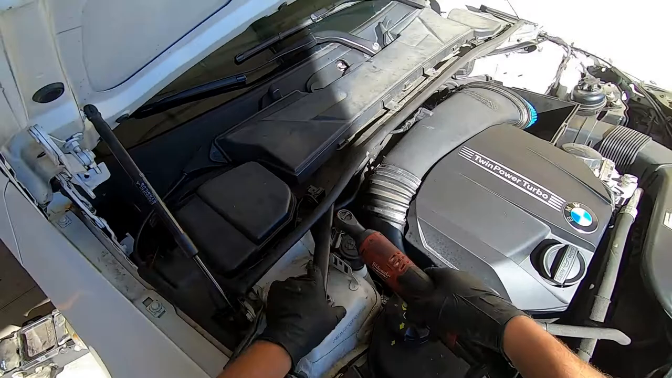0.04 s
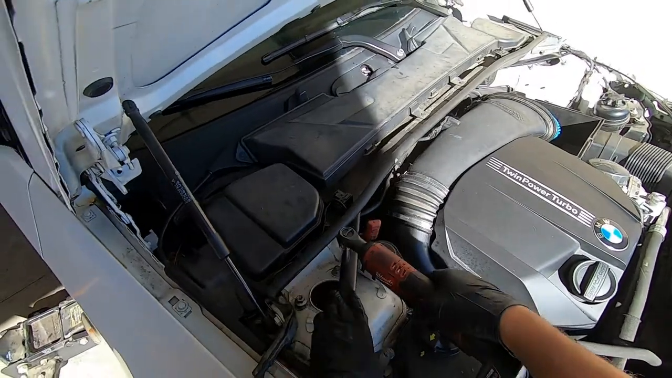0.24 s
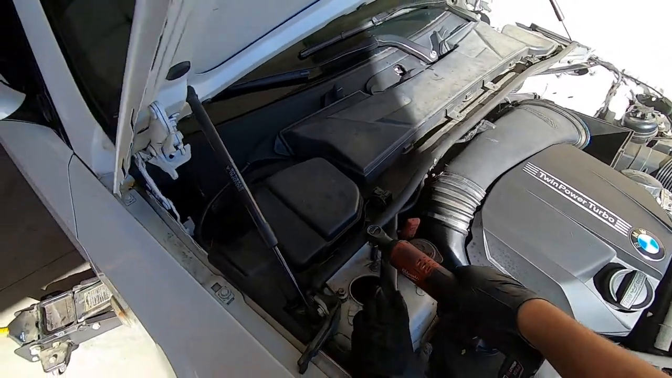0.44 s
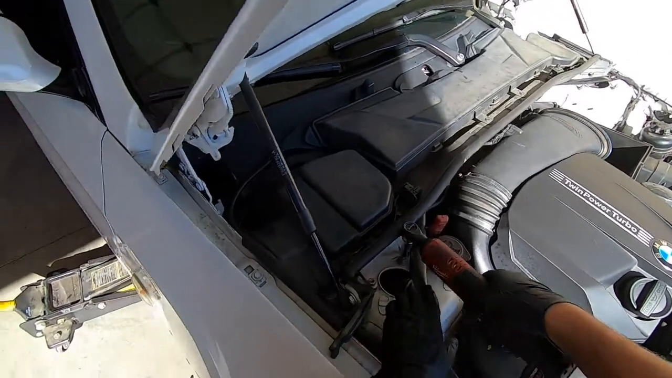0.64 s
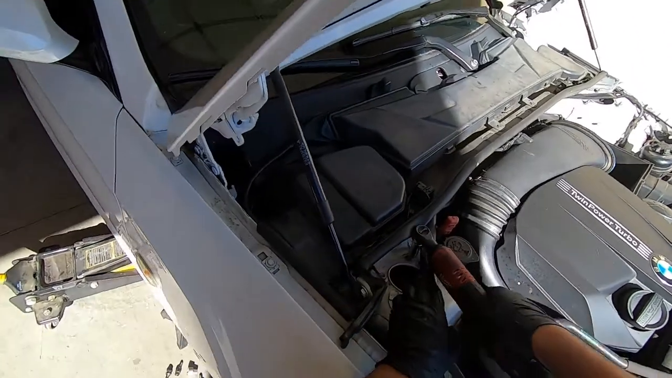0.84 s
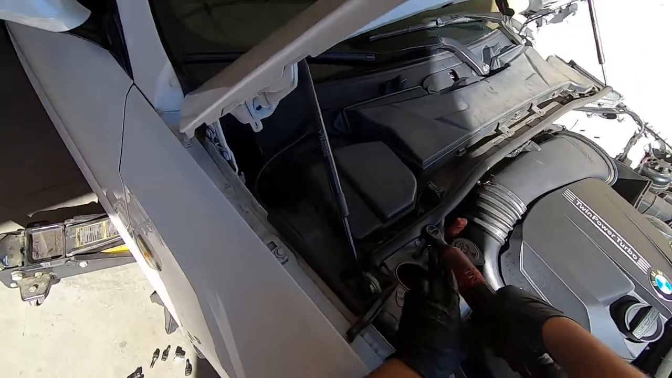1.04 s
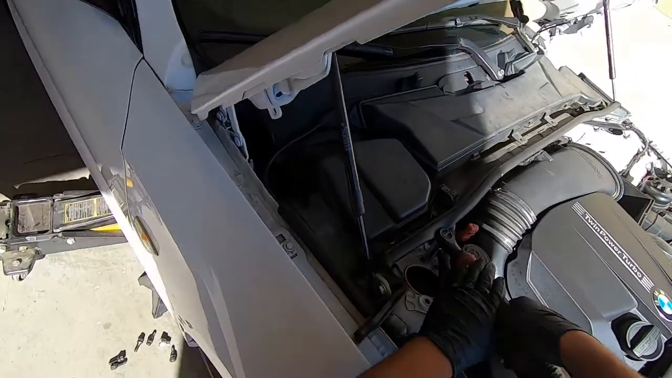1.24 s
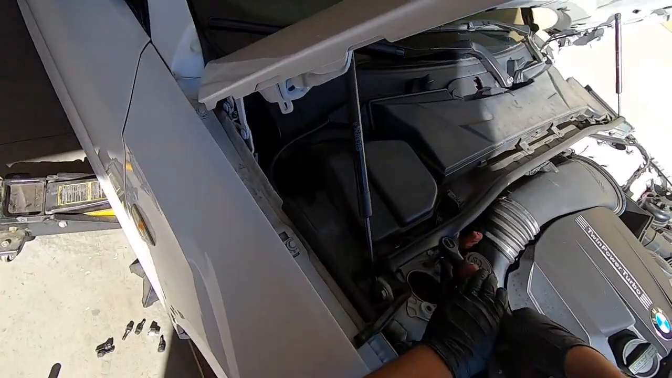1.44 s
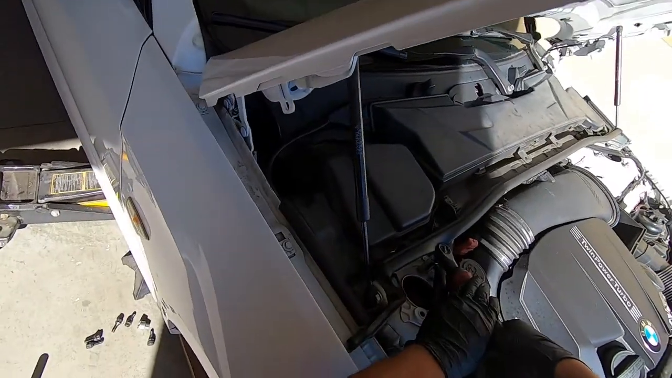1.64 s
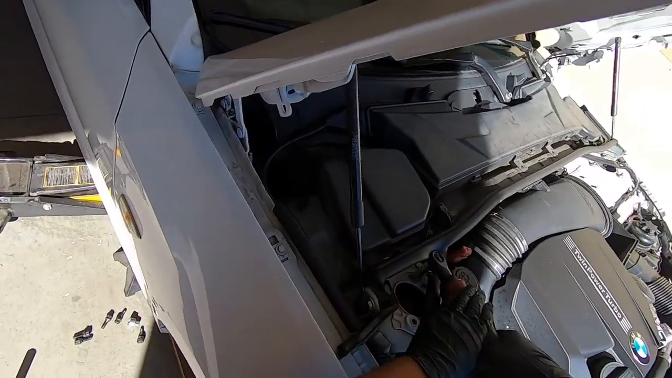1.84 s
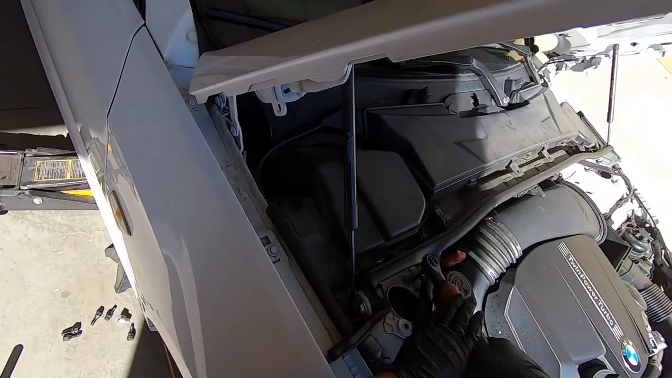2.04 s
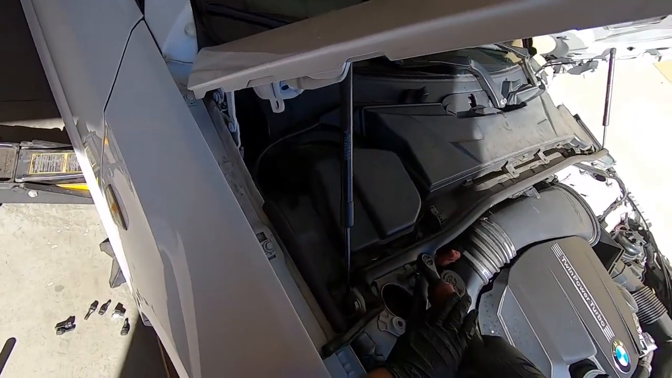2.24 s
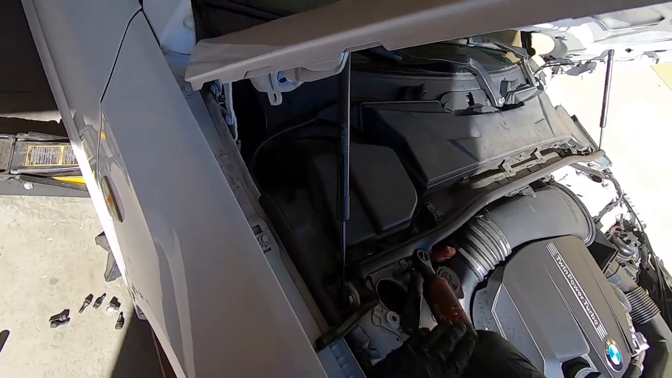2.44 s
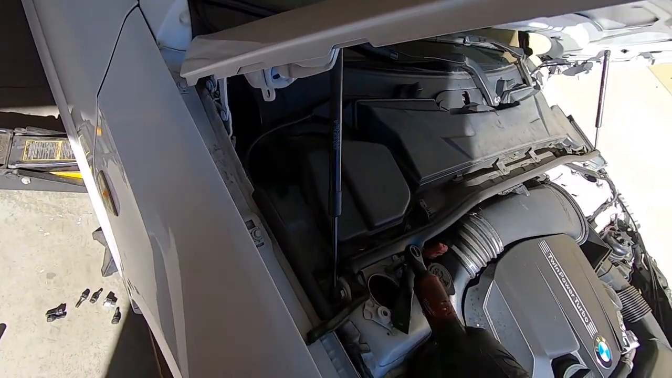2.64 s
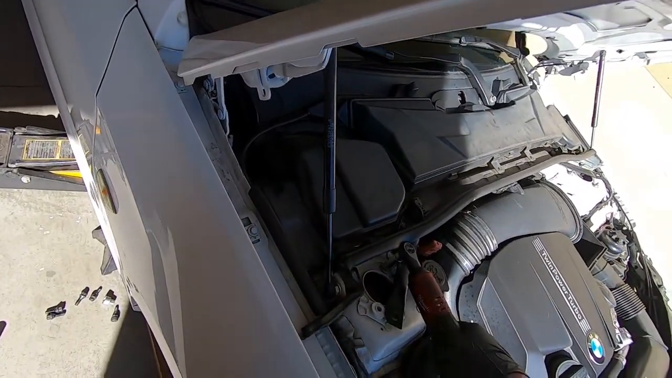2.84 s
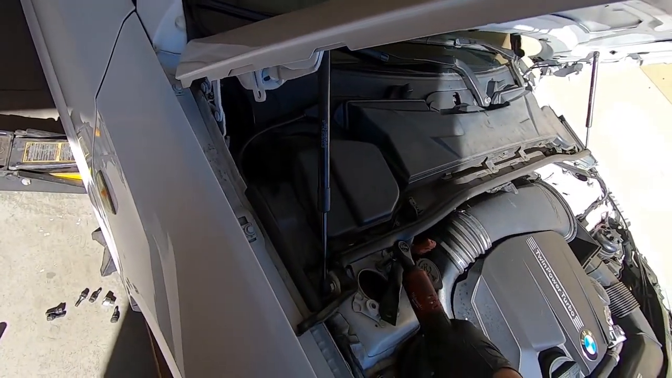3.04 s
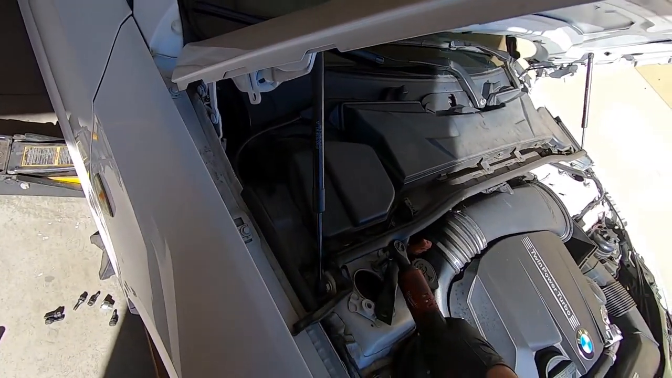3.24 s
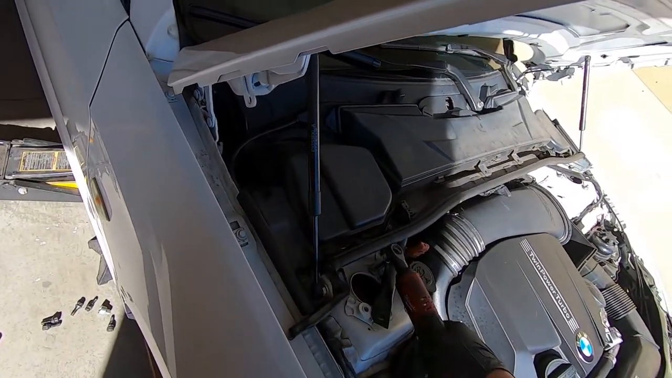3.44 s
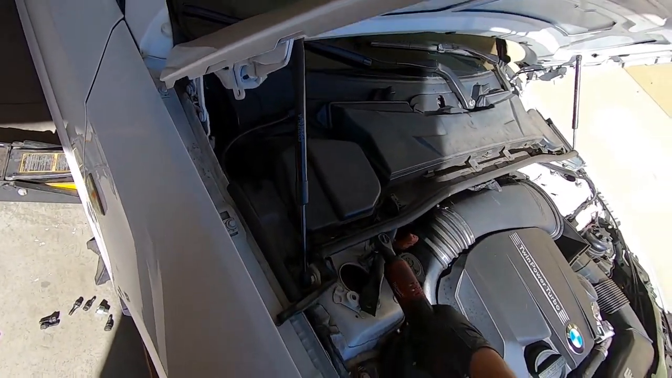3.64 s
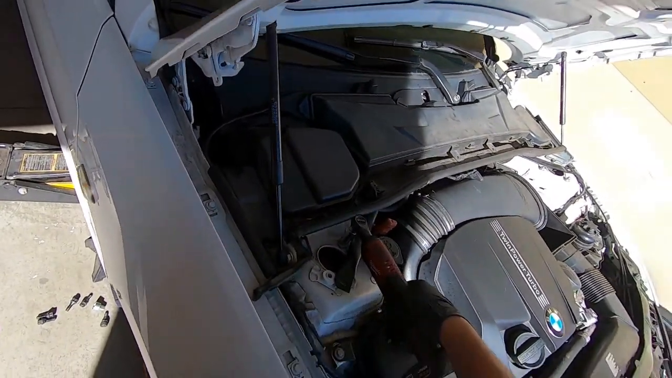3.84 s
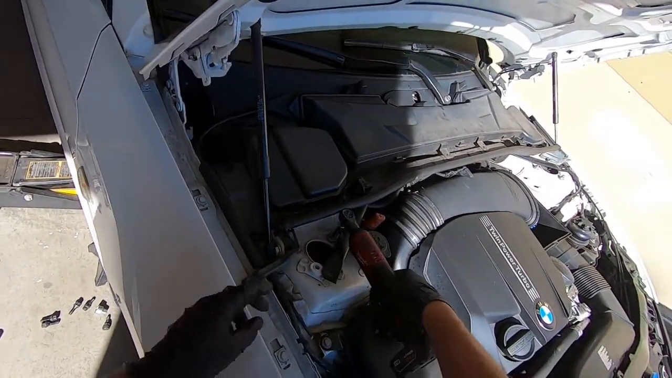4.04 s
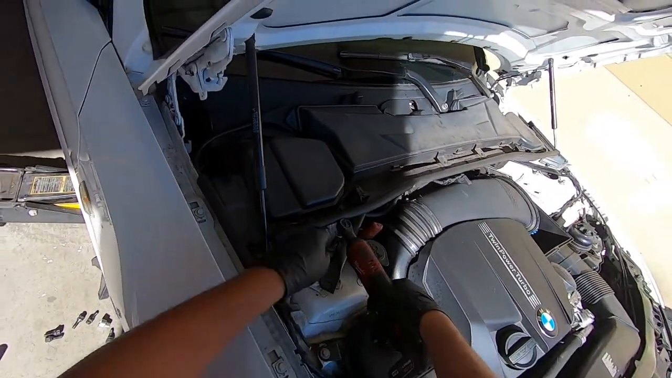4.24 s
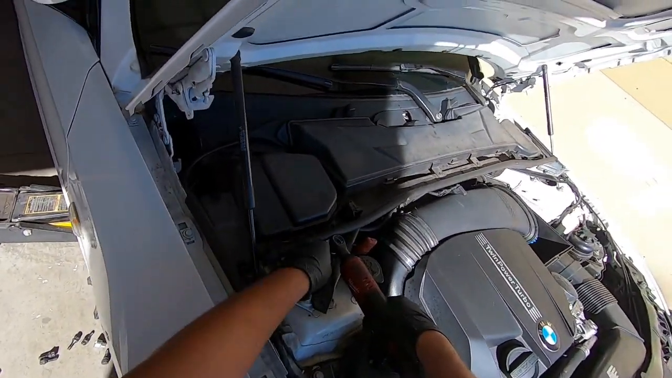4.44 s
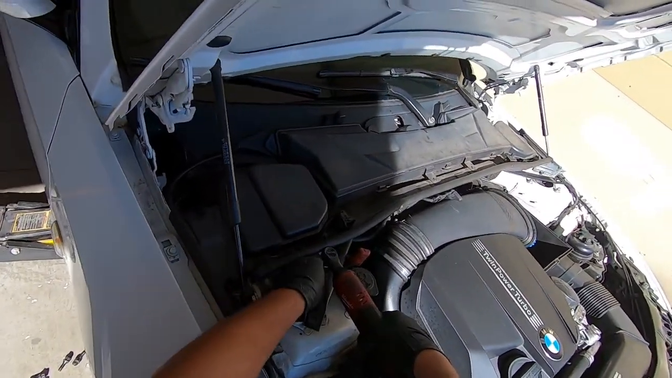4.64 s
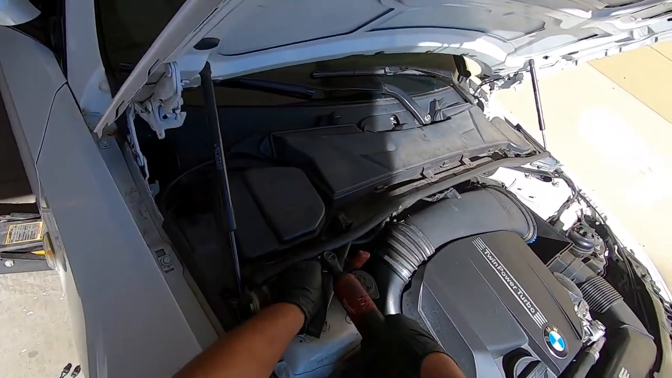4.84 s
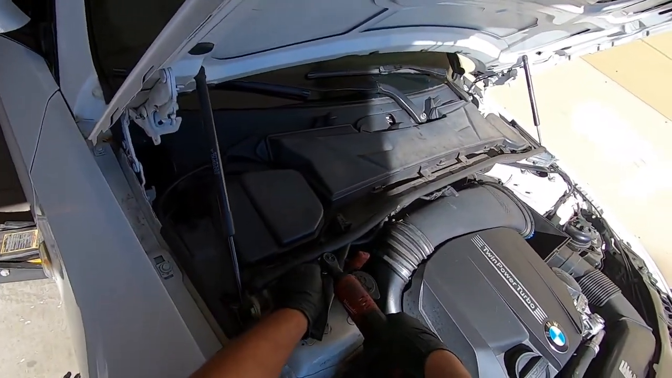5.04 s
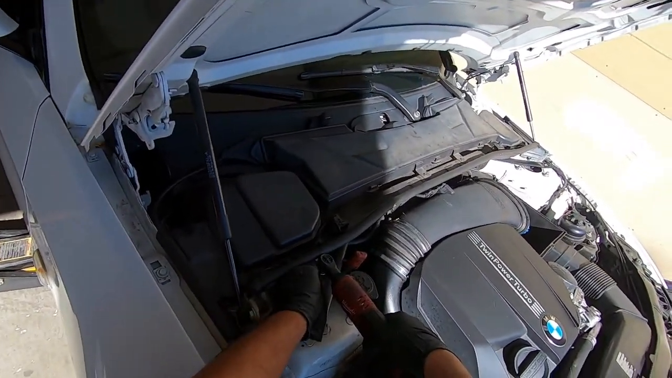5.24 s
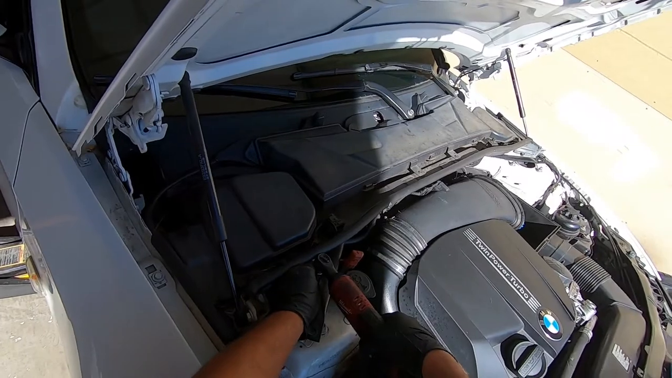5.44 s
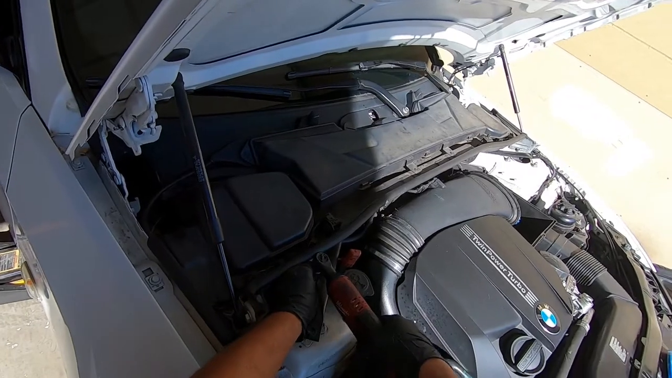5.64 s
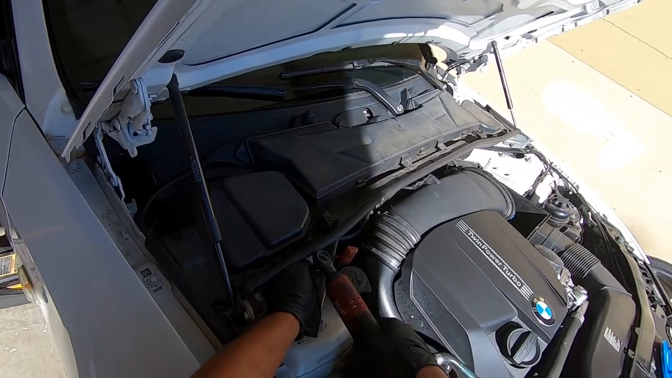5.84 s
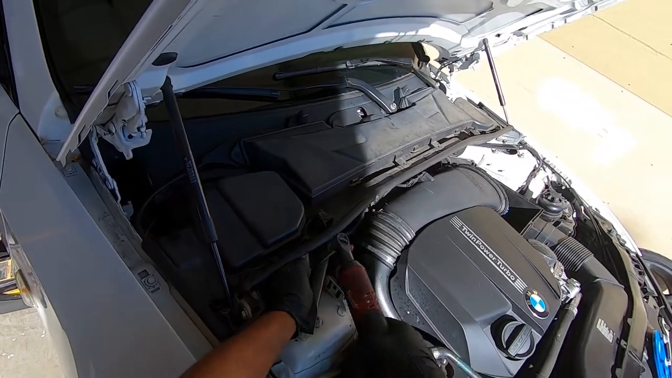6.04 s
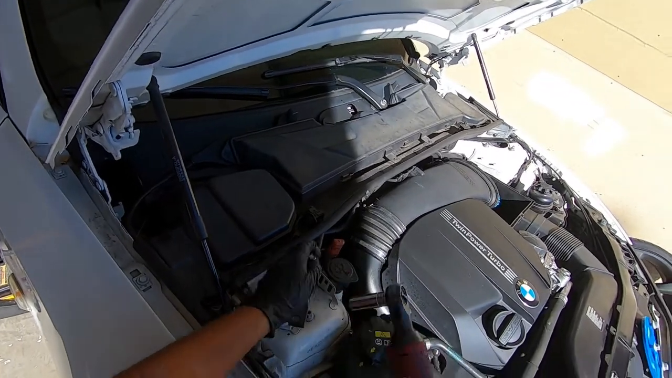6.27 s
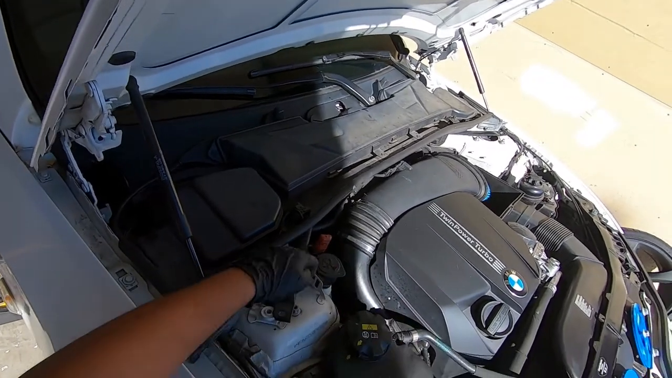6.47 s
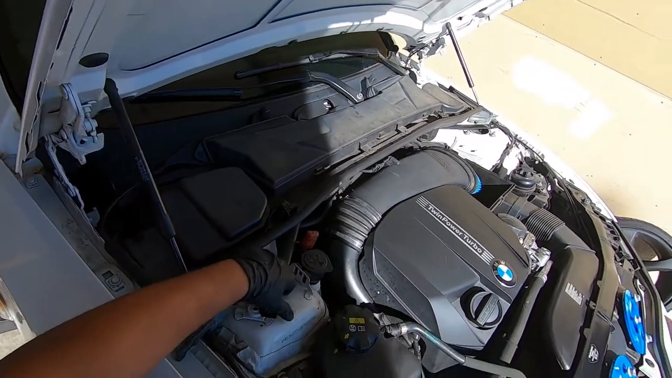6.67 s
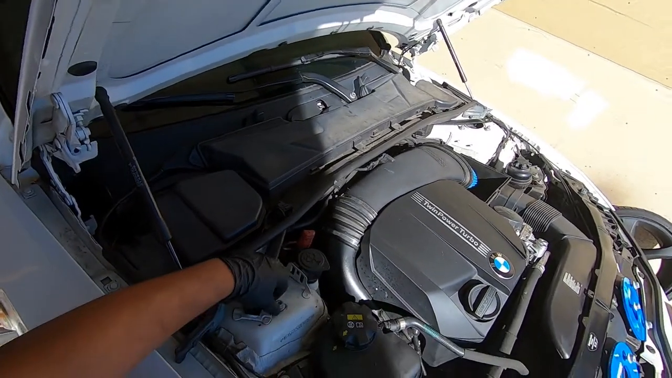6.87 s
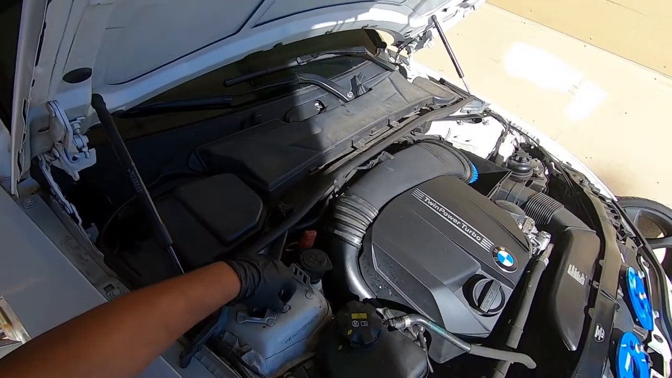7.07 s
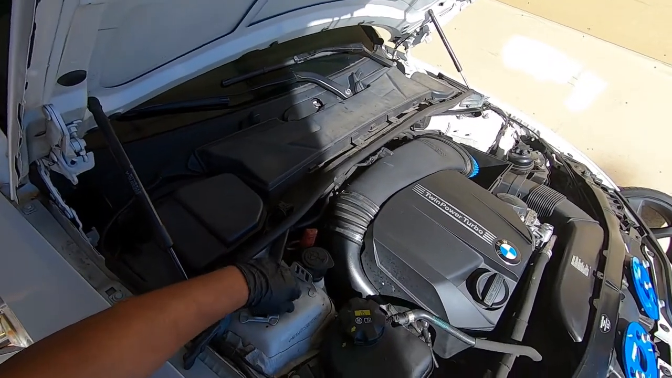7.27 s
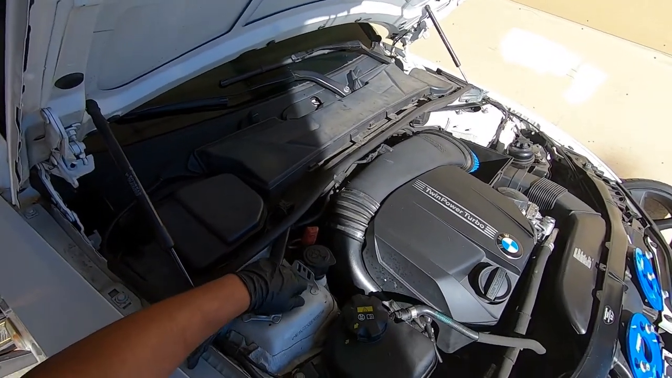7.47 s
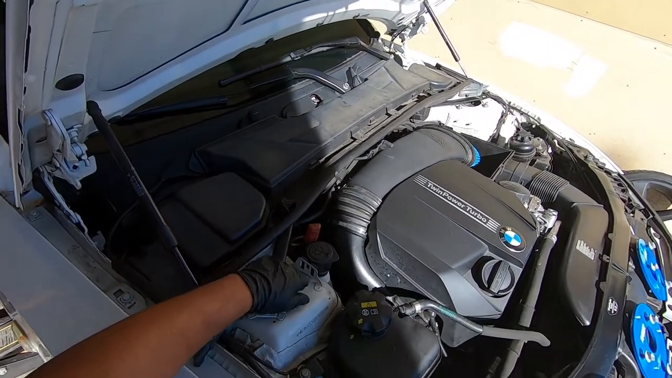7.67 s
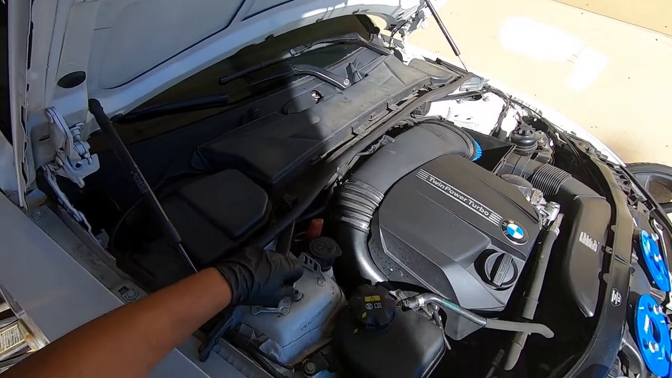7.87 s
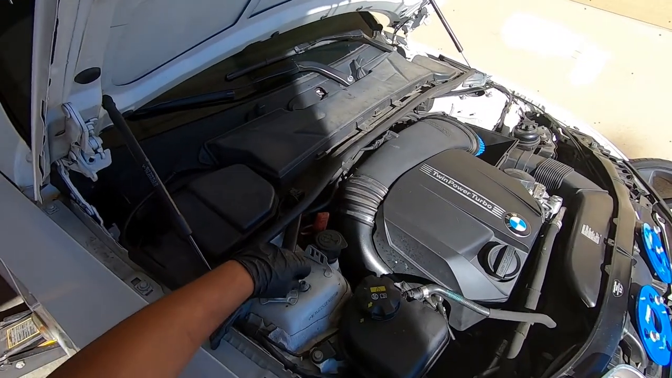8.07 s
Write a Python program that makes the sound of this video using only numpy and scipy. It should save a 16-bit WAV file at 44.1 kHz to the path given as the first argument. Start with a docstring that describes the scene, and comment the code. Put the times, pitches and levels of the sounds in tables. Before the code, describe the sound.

Close and slightly to the right, a metal socket clicks, clinks and bumps on a bolt in a car's engine bay, with the sharpest knocks near 0.1, 0.4 and 1 second. At 1.3 seconds a cordless ratchet chirps and spins up, biting at 1.5 with a thump and a loud surge. It runs with a fast, gritty rattle, a thin gear whine and a low panel hum that throbs most around 3 seconds. From about 3.8 seconds it runs slower and lighter, then winds down from 5.5 and stops with a small clink at 6. Faint ticks and gloved rubs follow. Around 6.9 seconds the tool is laid down, landing twice with a short, ringing clatter. The sounds carry a light garage echo. Quiet outdoor air continues until the end at 8 seconds, with very faint chirps, like a far bird, near 6.3 and 7.3.

```python
"""At the door of a garage, a cordless ratchet spins a bolt out in the engine bay of a car.
The socket knocks about until it seats. The motor chirps, spins up and rattles the pawl (the catch
that clicks over the gear teeth), first under load, then more slowly, and winds down to a stop.
A gloved hand turns the bolt on with faint ticks and rubs, and the tool is laid down with a clatter.
Behind it all are quiet outdoor air and a few faint chirps, like a far bird."""
import sys
import numpy as np
from scipy import signal
from scipy.fft import rfft, irfft, next_fast_len
from scipy.io import wavfile
from scipy.ndimage import uniform_filter1d

SR = 44100
rng = np.random.default_rng(int(sys.argv[2]) if len(sys.argv) > 2 else 0)


def generate_wav(sig):
    """Save sig (samples, or channels by samples) to the path in sys.argv[1] as 16-bit PCM at SR."""
    pcm = np.round(np.clip(np.atleast_2d(sig).T, -1, 1) * 32767).astype(np.int16)
    wavfile.write(sys.argv[1], SR, pcm)


N = 357651
T = np.arange(N) / SR
BITE_S, BITE_RISE_S, STOP_S = 1.48, 0.01, 6.0  # the socket bites; the brake stops the motor
TURNS_PER_STROKE, TURNS_PER_BOLT_TURN = 4.383, 109.5  # a stroke is one swing of the pawl


# How hard the bolt's thread grips: (time [s], load [0-1])
THREAD_GRIP = [(1.7, 1), (2.1, 0.64), (2.9, 0.65), (3.0, 0.98), (3.13, 0.67), (3.5, 0.6), (3.75, 0.15),
               (4.4, 0)]

def ratchet():
    """The motor's turns drive the rattling pawl and the gears, and shake the panel under the bolt."""
    load = np.clip(in_time(THREAD_GRIP), 0, 1)
    speed = motor_speed(load)
    pulled_s, full_speed, _ = TRIGGER_MOVES[0]
    running = uniform_filter1d(((T > pulled_s) & (T < STOP_S)) * 1., 400)
    turns = np.cumsum(speed * running * (1 + .0028 * drift(11))) / SR  # the speed wanders a little
    strokes = turns / TURNS_PER_STROKE
    octaves = np.log2((speed + 1) / full_speed)  # -1 means half speed
    press, wobble_db = bolt_wobble(turns)
    bitten, since_bite = ramp(BITE_S, BITE_RISE_S), np.maximum(T - BITE_S, 0)
    # faster is louder, and the bolt breaks free with a surge that dies away
    drive_db = -21 + 8 * octaves - 3.5 * load + 9 * bitten * np.exp(-since_bite / 0.22)
    shake_db = drive_db - 18 + 12 * np.exp(-(since_bite / 0.51) ** 2) + wobble_db
    whine = gear_whine(turns, load)
    hum = bitten * load * panel_hum(strokes, press, wobble_db)
    head = from_db(drive_db + 0.1 * wobble_db) * (rattle(strokes, speed, load) + pings(strokes, load))
    panel = from_db(shake_db) * panel_shake(strokes, load) + hum + thump()
    return running * (head + tip_ticks(strokes, octaves, load) + whine + panel)


# The trigger is pulled, eased and let go: (time [s], target speed [turns/s], time to get there [s])
TRIGGER_MOVES = [(1.37, 352.6, .43), (3.78, 266.4, .47), (5.45, 0, 1.25)]

def motor_speed(load):
    """Turns per second: the motor eases towards each target, and load slows it a little."""
    speed, before = 0, 0
    for s, target, seconds in TRIGGER_MOVES:
        speed = speed + (target - before) * (1 - (1 - ramp(s, seconds)) ** 2.3)
        before = target
    return speed * (1 - .024 * load)


def bolt_wobble(turns, pressing_s=2.765, worst_s=2.94, grow_s=1.22, fade_s=0.71):
    """The crooked bolt presses once each time it goes round; gives the push (0-1) and its swell in dB."""
    bolt_turns = (turns - np.interp(pressing_s, T, turns)) / TURNS_PER_BOLT_TURN
    depth = ramp(worst_s - grow_s, grow_s) - ramp(worst_s, fade_s)
    press = np.cos(np.pi * bolt_turns) ** 2
    return press, 16.5 * depth * press


def pawl(strokes, phase, scatter, spread_db):
    """One click on every stroke, a little off time and of uneven strength."""
    late, loud = rng.standard_normal((2, 512))
    count = min(int(strokes[-1]), 512)
    at = np.searchsorted(strokes, np.arange(count) + phase + scatter * late[:count])
    clicks = np.zeros(N)
    clicks[np.minimum(at, N - 1)] = from_db(spread_db * np.clip(loud[:count], -2, 2))
    return clicks


# Tone of the tool under load, and running free: (pitch [Hz], level [dB])
LOADED_TONE = [(100, -9.5), (230, -5), (330, -3), (480, -3.5), (950, 1), (1200, -5.5), (1600, 1),
               (2300, -3.5), (4000, -2), (5700, -9.5), (7500, -5), (9500, -16.5), (13000, -30.5),
               (15500, -46)]
FREE_TONE = [(100, -29), (230, -14), (350, -9.5), (480, -6), (950, -5), (1200, -5), (1600, -4), (2300, -2),
             (3400, -1.5), (5200, -6.5), (8000, -2.5), (9700, -13), (13000, -24), (15500, -44.5)]
# Pitches at which the tool's head rings: (pitch [Hz], width [Hz], boost [dB])
HEAD_PEAKS = [(1030, 78, 1.5), (1452, 87, 4), (2067, 160, 1), (2870, 110, -0.5), (3156, 130, 3.5),
              (3840, 76, 2.5), (6680, 220, 1.5), (7340, 67, -1.5), (12700, 1400, 5.5)]
# The pawl's clicks are brighter than the gear grit: (pitch [Hz], level [dB])
PAWL_TONE = [(1000, -4.5), (4000, -2), (7000, 0.5), (13000, 3)]

def rattle(strokes, speed, load):
    """Gritty gear noise swells once a stroke, between the chattering clicks of the pawl."""
    # a hard click as the swing turns back, then two skipped teeth
    turnaround = pawl(strokes, phase=0, scatter=.015, spread_db=0.5)
    skips = pawl(strokes, phase=1 / 3, scatter=0.035, spread_db=1.0)
    skips += pawl(strokes, phase=2 / 3, scatter=0.04, spread_db=0.5)
    clicks = die_away(turnaround + (0.72 - 0.25 * load) * skips, seconds=.0007)
    clicks *= .45 + rng.standard_normal(N)  # each also pushes the head the same way: a low buzz
    # gear teeth and the loose socket add many tiny hits
    grit = (rng.random(N) < 12 * speed / SR) * rng.standard_normal(N)
    grit *= from_db(-12 + 3 * load + 2.6 * np.cos(2 * np.pi * strokes))
    even_out = 1 / np.sqrt(uniform_filter1d(clicks ** 2 + grit ** 2, 3000) + 1e-4)
    ticks = through(moving_echoes(clicks * even_out, echo_db=-4.5, t60=0.04), tone_filter(PAWL_TONE))
    both = ticks * from_db(3.5) + moving_echoes(grit * even_out, echo_db=3.5, t60=0.084)
    loaded = through(both, tone_filter(LOADED_TONE, HEAD_PEAKS))
    free = through(both, tone_filter(FREE_TONE, HEAD_PEAKS))
    return load * loaded + (1 - load) * free


# Short notes of the head: (pitch [Hz], level under load [dB], level running free [dB], decay [s])
HEAD_PINGS = [(1579, -12, -16, 0.002), (2895, -12.5, -15, .004), (3450, -14.5, -22, 0.004),
              (7420, -16, -15, 0.00076)]

def pings(strokes, load):
    """Every stroke rings the head again, never with quite the same strength or pitch."""
    out = 0
    for hz, loaded_db, free_db, seconds in HEAD_PINGS:
        envelope = die_away(pawl(strokes, phase=0, scatter=.02, spread_db=3.5), seconds)
        envelope /= np.sqrt(np.mean(envelope[(T > BITE_S) & (T < STOP_S)] ** 2) / 2)
        tone = sine(hz * (1 + .035 * drift(70)))
        out = out + from_db(load * loaded_db + (1 - load) * free_db) * envelope * tone
    loose_db = 4.5 * np.exp(-((T - 5.2) / 0.22) ** 2)  # the loose bolt briefly lets it ring more
    return out * from_db(loose_db)


def tip_ticks(strokes, octaves, load, hz=12900, decay_s=.0005):
    """The pawl's tip drops over three teeth a stroke, each time with a tiny, very high ring."""
    drops = sum(pawl(strokes, phase=k / 3, scatter=.035, spread_db=7.0) for k in range(3))
    envelope = signal.lfilter([1], [1, -np.exp(-1 / (decay_s * SR))], uniform_filter1d(drops, 12) + 1e-18)
    tone = sine(hz * (1 + .035 * drift(500)))
    level = from_db(-30.5 - 17 * load + 1.5 * octaves)
    return moving_echoes(level * envelope * tone, echo_db=-10, t60=0.02)


# How loud the gears whine: (time [s], level [dB])
WHINE_LEVEL = [(1.6, -45.5), (1.72, -30), (2.3, -30), (3.4, -32), (3.75, -31.5), (3.88, -35.5),
               (4.02, -40.5), (4.35, -42), (4.46, -34), (5.4, -31), (5.52, -37), (5.75, -50)]

def gear_whine(turns, load):
    """Twelve teeth meet on each turn; under load the motor also sings at nine times its speed."""
    teeth = np.sin(2 * np.pi * 12 * turns + .1 * drift(150))
    motor = np.sin(2 * np.pi * 9 * turns + .45 * drift(150))
    return from_db(in_time(WHINE_LEVEL) + 1.4 * drift(25)) * (teeth + 0.56 * load * motor)


# Notes of the panel's hum: (pitch [times the stroke rate], level [dB], share of the throb [0-1])
HUM_NOTES = [(1, -34.5, 1), (2, -41.5, 1), (4, -43, 0.28)]

def panel_hum(strokes, press, wobble_db):
    """Each stroke rocks the panel; the hum sinks between the pushes of the crooked bolt."""
    throb_db = 0.6 * wobble_db - 16 * (1 - press) ** 2
    return sum(from_db(db + share * throb_db) * np.sin(2 * np.pi * k * strokes + .3 * drift(30))
               for k, db, share in HUM_NOTES)


def panel_shake(strokes, load):
    """Under load each stroke kicks the panel; running free, only a light rattle reaches it."""
    jostle = filtered(rng.standard_normal(N), "high", hz=110)
    kicks = .35 * rms_one(pawl(strokes, phase=0, scatter=0.026, spread_db=4.5)) + 1.5 * jostle
    light = filtered(rng.standard_normal(N), "high", hz=160)
    shake = through(load * kicks + 0.68 * light, panel_ring())
    return shake / np.sqrt(uniform_filter1d(shake ** 2, 3000) + 1e-3)  # even out the level


# Notes of the panel under the bolt: (pitch [Hz], width [Hz], level [dB])
PANEL_NOTES = [(77.2, 25, 0.5), (125.6, 16, -0.5), (169.7, 9.6, 2), (193.6, 13, -0.5), (239.8, 20, -3),
               (311.7, 18, -5.5), (380, 64, -6.5), (476, 140, -4)]

def panel_ring():
    """The struck panel's low ring, alike in both ears; wider notes die sooner."""
    t, ring = T[:SR // 2], 0
    for k, (hz, width, db) in enumerate(PANEL_NOTES):
        envelope = from_db(db) * np.sqrt(width) * np.exp(-np.pi * width * t)
        ring = ring + (-1) ** k * envelope * np.sin(2 * np.pi * hz * t)
    return unit_energy(ring)


def thump(hz=72.6, peak_s=0.022):
    """The panel heaves for a few cycles as the bolt gives."""
    t = np.maximum(T - BITE_S, 0)
    return from_db(-21) * (t / peak_s * np.exp(1 - t / peak_s)) ** 2 * np.sin(2 * np.pi * hz * t)


# Clear notes of the starting motor, and the tone of its rasp: (pitch [Hz], level [dB])
CHIRP_NOTES = [(1841, -44.5), (3682, -44.5), (5523, -56.5), (7364, -57)]
RASP_TONE = [(200, -18.5), (1200, -13), (1780, 2.5), (2400, -13.5), (3700, -15.5), (6000, -25),
             (14000, -48)]

def motor_chirp(start_s=1.295, hold_s=0.094, fade_db_per_s=91):
    """Fast-switched current sings in the coils, turning rough and throbbing as the motor starts to move."""
    moving = ramp(start_s + 0.011, 0.057)
    notes = sum(from_db(db) * np.sin(2 * np.pi * hz * T + .6 * moving * drift(380))
                for hz, db in CHIRP_NOTES)
    rasp = from_db(-36.5) * moving * through(rng.standard_normal(N), tone_filter(RASP_TONE))
    throb = 1 + .3 * moving * np.sin(2 * np.pi * 85 * T)
    fade = from_db(-fade_db_per_s * np.maximum(T - start_s - hold_s, 0))
    return (notes + rasp) * throb * ramp(start_s, .005) * fade * (1 - ramp(BITE_S, BITE_RISE_S))


# Socket and hand touch the bolt: (time [s], click [dB], bump [dB], brightness [dB/octave], chatter [s],
# ring compared with click [dB], main pitch [Hz], second pitch [Hz], click sent to the garage [dB])
TOUCHES = [(0.002, -23.5, -7, 3.5, 0.033, 5.5, 7400, 2700, 0),
           (0.088, -3.5, 5, 0.5, 0.0044, -4, 7300, 3780, -14.5),
           (0.104, -3, -10, -6.5, 0.0044, -11.5, 400, 1645, -23),
           (0.113, -10, -7.5, 9, 0.0028, 1.5, 7300, 3770, -11),
           (0.38, -1.5, 0.5, 0, 0.0044, 0, 4640, 4460, -16.5),
           (0.394, -7, -19, -7.5, 0.0038, -13.5, 520, 950, -17.5),
           (0.406, -22.5, -13.5, 2, 0.011, -1.5, 4420, 2660, -13),
           (0.595, -11.5, -14.5, 3.5, 0.02, 4, 1600, 2630, -12),
           (0.609, -12.5, -16, 4, 0.0026, 7, 1620, 1620, -17.5),
           (0.862, -0.5, -7.5, -0.5, 0.0027, -29, 3400, 2000, -10),
           (0.957, 4.5, -0.5, 5, 0.0027, -26.5, 3740, 3000, -10),
           (1.019, -12.5, -12, -4.5, 0.0035, -11, 988, 1513, -29),
           (1.229, -28, -24, 6, 0.0025, -16.5, 1693, 3000, -23.5),
           (1.401, -6.5, -2, 7.5, 0.001, -11.5, 7340, 6400, -32.5),
           (1.416, -14.5, -19, 13.5, .0013, -17.5, 12500, 7300, -27.5),
           (1.467, -10.5, -9, 2, 0.0035, -13, 3760, 7300, -19.5),
           (1.493, -4, 2, -5.5, 0.0041, -35, 450, 3300, -24.5),
           (5.992, -15.5, -41, -1.5, 0.0074, 3, 5300, 3937, -3),
           (6.189, -26, -8.5, 10, .001, -23, 3004, 5300, -7),
           (6.475, -32.5, -35, -4.5, 0.0051, -8, 3000, 7300, 0),
           (6.602, -33, -42, 6, 0.0017, -17, 3000, 5300, -20)]
# Tone of a knock: (pitch [Hz], level [dB])
KNOCK_TONE = [(100, -23), (220, -13), (380, -2), (600, -3.5), (1200, -2.5), (1700, 0), (2300, 0.5),
              (3000, -1), (4600, -4.5), (7400, -16), (10000, -24), (15000, -72)]
# Notes of the socket: (pitch [Hz], level [dB], time to fade by 60 dB [s])
SOCKET_NOTES = [(1600, -3, 0.09), (2590, -5, 0.14), (2830, 0.5, 0.1), (3760, 0, 0.074), (4450, 0, 0.076),
                (5300, -4, 0.14), (6500, -17.5, .16), (7280, -8.5, .1), (8500, -6.5, 0.12),
                (9000, -14, 0.16)]

def knocks(width_hz=840):
    """Each touch clicks, rings the socket and bumps the panel; gives the near sound and the garage's share."""
    out, to_garage = np.zeros((2, 2, N))
    thud, dull = panel_ring()[None], tone_filter(KNOCK_TONE, tilt_db=-7)
    for s, click_db, bump_db, tilt_db, seconds, ring_db, hz, second_hz, garage_db in TOUCHES:
        force = from_db(click_db) * chatter(seconds, per_s=1900)
        strength = np.linalg.norm(force)
        tone = tone_filter(KNOCK_TONE, [(hz, width_hz, 6)], tilt_db)
        add(out, s, through(spot_echoes(force, echo_db=9.0, t60=0.011), tone))
        add(out, s, strength * from_db(-6.0) * through(bay_echoes(t60=0.11), tone))
        # the socket rings most near the two pitches of this touch
        notes = [(f, db + 11.5 * max(nearness(f, hz, width_hz), nearness(f, second_hz, width_hz)), t60)
                 for f, db, t60 in SOCKET_NOTES]
        ring = strength * from_db(ring_db) * ringing(notes)
        add(out, s, ring)
        add(out, s, from_db(click_db - 8.5) * thud)
        add(to_garage, s, from_db(-18) * ring)
        add(to_garage, s, strength * from_db(garage_db) * tone[None])
        # the tool's weight follows as a dull, scraping bump
        bump_s = s + .02
        scrape = from_db(bump_db - 15) * chatter(0.016, per_s=1700)
        add(out, bump_s, through(spot_echoes(scrape, echo_db=7.0, t60=0.03), dull))
        add(out, bump_s, np.linalg.norm(scrape) * from_db(-7.0) * through(bay_echoes(t60=0.34), dull))
        add(out, bump_s, from_db(bump_db) * thud)
        add(to_garage, bump_s, from_db(bump_db - 10) * thud)
    return out, to_garage


# Hits as the tool is laid down: (time [s], level [dB], brightness [dB/octave], chatter [s])
LANDINGS = [(6.887, -19, -4, 0.031), (6.916, -3, -2.5, 0.0342), (6.962, -17.5, -8.5, 0.04),
            (7.004, -3, 2, 0.042), (7.062, -9.5, 5, 0.0105), (7.1, -12, 0, 0.004)]
# Tone of each hit: (pitch [Hz], level [dB])
CLATTER_TONE = [(100, -20), (230, -11), (340, 0.5), (470, -15), (600, -3), (1050, -2), (1700, -6.5),
                (2900, -2.5), (4500, -9), (8300, -21), (11000, -29.5), (15000, -58)]
# Notes of the tool and what it lies on: (pitch [Hz], level [dB], time to fade by 60 dB [s])
LANDING_NOTES = [(308, 6.5, 0.07), (388, 6, 0.075), (570, 4, 0.14), (1039, 3, 0.11), (1513, -2.5, 0.11),
                 (2105, -7.5, 0.2), (2630, 0, 0.12), (2864, 4.5, 0.12), (3020, 2, .12), (3467, 0, 0.13),
                 (3994, -3, 0.19), (4409, 1.5, 0.3), (5140, -4, 0.1), (5356, -3.5, 0.23), (6659, -9.5, .18),
                 (7424, -10.5, .25), (8156, -10, 0.18)]

def clatter():
    """The tool lands twice and skitters, ringing what it lies on."""
    out, ring = np.zeros((2, N)), ringing(LANDING_NOTES)
    for s, db, tilt_db, seconds in LANDINGS:
        force = chatter(seconds, per_s=1100)
        tone = tone_filter(CLATTER_TONE, tilt_db=tilt_db)
        clack = through(spot_echoes(force, echo_db=10, t60=0.12), tone)
        add(out, s, from_db(db) * (from_db(-2) * clack + through(force, ring)))
    return out


def chatter(seconds, per_s, size=20000):
    """A first hit and a run of smaller, uneven bounces."""
    at = np.cumsum(rng.uniform(.4, 1.6, 256)) / per_s
    strength = rng.uniform(0.56, 0.6, len(at)) * rng.choice([-1, 1], len(at))
    force = np.zeros(size)
    force[np.minimum(at * SR, size - 1).astype(int)] = strength * np.clip((seconds - at) * per_s, 0, 1)
    force[0] = .8
    return force


def ringing(notes):
    """The fading notes of a struck object, each a little different in each ear."""
    t = T[:SR // 2]
    phases = rng.uniform(-1.3, 1, (len(notes), 2, 1))
    extras_db = rng.normal(0, 2.2, (len(notes), 2, 1))
    return unit_energy(sum(from_db(db + extra_db - 60 * t / t60) * np.sin(2 * np.pi * hz * t + phase)
                           for (hz, db, t60), phase, extra_db in zip(notes, phases, extras_db)))


# Faint high rubs, then a low scrape as the tool touches down:
# (loudest moment [s], half length [s], level [dB], pitch [Hz])
SCRAPES = [(6.055, 0.013, -62, 5500), (6.233, 0.043, -64, 6400), (6.48, .04, -64, 5500),
           (6.558, 0.037, -67, 5400), (6.848, 0.062, -56, 4450), (6.882, 0.025, -42.5, 790)]

def scrapes():
    """Short, grainy scrapes, each around its own pitch."""
    out, t = np.zeros((2, N)), T[:SR // 4]
    for s, half, db, hz in SCRAPES:
        grains = stereo_noise(len(t)) * from_db(3.5 * drift(402)[:len(t)])
        scrape = rms_one(filtered(grains, "band", [hz * .6, hz * 1.5]))
        add(out, s - t.mean(), from_db(db) * scrape * np.exp(-((t - t.mean()) / half) ** 2))
    return out


# Faint chirps: (time [s], length [s], start pitch [Hz], end pitch [Hz], level [dB])
BIRD_NOTES = [(6.304, 0.055, 4300, 3700, -59), (6.393, 0.053, 3320, 3000, -60),
              (7.285, .07, 3710, 3097, -58)]

def bird():
    """Thin, warbling notes that arch and fall, like a far bird."""
    out = np.zeros((1, N))
    for s, seconds, start_hz, end_hz, db in BIRD_NOTES:
        progress = np.linspace(0, 1, int(seconds * SR))
        arch = np.sin(np.pi * progress)
        glide = start_hz + (end_hz - start_hz) * progress
        hz = glide * (1 + 0.046 * arch + 0.034 * drift(590)[:len(arch)])
        add(out, s, from_db(db) * (arch * sine(hz))[None])
    return out


# Tone of the air and the rumble: (pitch [Hz], level [dB])
AIR_TONE = [(25, -10), (80, -9.5), (200, -7), (330, -14.5), (500, -17.5), (900, -15.5), (1400, -22),
            (2000, -27.5), (3000, -39), (4700, -30.5), (6000, -45.5), (8000, -44.5), (14000, -70.5)]
# Low rumble, first the panel still ringing from an earlier knock, then hands shifting about:
# (loudest moment [s], half length [s], level [dB])
RUMBLES = [(0.005, 0.13, -32.5), (0.902, 0.42, -54), (7.298, 0.42, -53.5)]

def air_and_rumble(air_db=-56):
    """Steady outdoor air, with a low rumble that swells and fades."""
    rumble = sum(from_db(db) ** 2 * np.exp(-2 * ((T - s) / half) ** 2) for s, half, db in RUMBLES)
    level = np.sqrt(from_db(air_db) ** 2 + rumble)
    return level * through(stereo_noise(N, spread=1.5), tone_filter(AIR_TONE))


def bay_echoes(t60):
    """The dense, short echoes of the engine bay; t60 is the seconds they take to fade by 60 dB."""
    t = T[:SR // 5]
    build_up = 1 - np.exp(-t / 0.0049)
    return unit_energy(stereo_noise(len(t), spread=0.67) * from_db(-60 * t / t60) * build_up)


def echo_pattern(t60):
    """One random pattern of very short echoes."""
    t = T[:SR // 20]
    return unit_energy(stereo_noise(len(t), spread=0.15) * from_db(-60 * t / t60))


def spot_echoes(force, echo_db, t60):
    """Hits land on one of two spots, each with its own short echoes."""
    spot = rng.integers(0, 2, len(force))
    echoes = sum(through(force * (spot == k), echo_pattern(t60)) for k in range(2))
    return (force + from_db(echo_db) * echoes) / np.sqrt(1 + from_db(2 * echo_db))


def moving_echoes(force, echo_db, t60, size=8000):
    """The tool moves in the hand, so its short echoes keep changing."""
    echoes = np.zeros((2, N))
    for i in range(0, int(STOP_S * SR), size // 2):
        piece = force[i:i + size] * np.sqrt(np.hanning(size))
        add(echoes, i / SR, signal.fftconvolve(piece[None], echo_pattern(t60), axes=-1))
    return (force + from_db(echo_db) * echoes) / np.sqrt(1 + from_db(2 * echo_db))


# How long the garage echoes: (pitch [Hz], time to fade by 60 dB [s])
GARAGE_FADE = [(100, 1.98), (500, 0.85), (1500, 1.27), (2800, 0.86), (5600, 0.78), (11000, 0.59)]

def garage(x):
    """The garage's long echo, which dies soonest in the treble."""
    t, edges = T[:SR * 3 // 2], np.geomspace(60, 16000, 9)
    noise, tail = stereo_noise(len(t), spread=3.5), 0
    for low, high in zip(edges, edges[1:]):
        t60 = at_hz(GARAGE_FADE, np.sqrt(low * high))
        tail = tail + filtered(noise, "band", [low, high]) * from_db(-60 * t / t60)
    return through(x, unit_energy(tail * (1 - np.exp(-t / 0.0019))))


# Balance between the ears: (pitch [Hz], left minus right [dB])
EAR_BALANCE = [(60, 0.5), (110, -2), (200, -0.5), (380, -1), (700, -4), (1290, -6.5), (2380, -4.5),
               (4400, -1.5), (8120, -4.5), (15000, -1.5)]
# Timing between the ears: (pitch [Hz], how far the left is ahead [radians])
EAR_TIMING = [(130, 0.02), (350, -0.15), (900, -0.2), (2070, 0.08), (4000, -0.64), (5900, 0.5),
              (7300, -1.15), (8600, -2.01), (12800, -1.26)]

def off_centre(x):
    """The work is heard to one side: each pitch has its own level and delay in each ear."""
    size = next_fast_len(N + 2048)
    hz = np.arange(size // 2 + 1) * SR / size
    sides = np.array([[.5], [-.5]])
    level = from_db(at_hz(EAR_BALANCE, hz) * sides)
    delay = np.exp(1j * at_hz(EAR_TIMING, hz) * sides)
    return irfft(rfft(x, size) * level * delay, size)[:, :N]


# How alike the two ears are before any spread: (pitch [Hz], likeness [0-1])
EAR_LIKENESS = [(60, 1), (130, 0.99), (290, 0.96), (640, 0.9), (1410, 0.45), (3100, 0.96), (6820, 0.54),
                (15000, 0.22)]

def stereo_noise(count, spread=0):
    """Hiss whose two sides are alike in the bass and less so in the treble; spread parts them more."""
    size = next_fast_len(count)
    hz = np.arange(size // 2 + 1) * SR / size
    alike = np.clip(at_hz(EAR_LIKENESS, hz), 0, 1) ** (1 + spread)
    mid, side = rfft(rng.standard_normal((2, size)))
    spectrum = np.sqrt((1 + alike) / 2) * mid + np.sqrt((1 - alike) / 2) * side * [[1], [-1]]
    return irfft(spectrum, size)[:, :count]


def tone_filter(tone, peaks=(), tilt_db=0, size=4096):
    """How an object answers a tap, given its tone, ringing peaks and a tilt per octave around 3 kHz."""
    hz = np.arange(size // 2 + 1) * SR / size
    db = at_hz(tone, hz) + tilt_db * np.log2(np.maximum(hz, 500) / 3000)
    for centre, width, peak_db in peaks:
        db = db + peak_db * nearness(hz, centre, width)
    # this fold makes all of the sound come after the tap, none before
    cepstrum = irfft(np.log(from_db(db)))
    cepstrum[1:size // 2] *= 2
    cepstrum[size // 2 + 1:] = 0
    return unit_energy(irfft(np.exp(rfft(cepstrum))))


def nearness(hz, centre, width):
    """How near a pitch is to a peak, 0-1."""
    return 1 / (1 + (2 * (hz - centre) / width) ** 2)


def die_away(clicks, seconds):
    """Give each click a fading tail with the same energy."""
    kept = np.exp(-2 / (seconds * SR))
    return np.sqrt(signal.lfilter([1 - kept], [1, -kept], clicks ** 2 + 1e-18))


def sine(hz):
    """A pure tone that follows a changing pitch."""
    return np.sin(2 * np.pi * np.cumsum(hz) / SR)


def drift(per_s):
    """A random wander, about 1 in size."""
    count = int(N / SR * per_s) + 2
    return np.interp(T * per_s, np.arange(count), rng.standard_normal(count))


def ramp(start, seconds):
    """Rise from 0 to 1 over a stretch of time."""
    return np.clip((T - start) / seconds, 0, 1)


def in_time(rows):
    """Read a table at every sample."""
    return np.interp(T, *np.array(rows).T)


def at_hz(rows, hz):
    """Read a table at any pitch, with octaves evenly spaced."""
    pitches, values = np.array(rows).T
    return np.interp(np.log(hz + 1), np.log(pitches), values)


def from_db(db):
    """Turn decibels into a volume factor."""
    return 10 ** (np.asarray(db) / 20)


def rms_one(x):
    """Scale to an average (rms) level of 1."""
    return x / np.sqrt(np.mean(x ** 2) + 1e-20)


def unit_energy(x):
    """Scale a response so that hiss passes through at the same level."""
    return rms_one(x) / np.sqrt(x.shape[-1])


def filtered(x, kind, hz, order=2):
    """Keep only the highs, or one band of pitches."""
    return signal.sosfilt(signal.butter(order, hz, kind, fs=SR, output="sos"), x)


def through(x, response):
    """Pass a sound through a ring, echo or filter, keeping its length."""
    return signal.oaconvolve(np.atleast_2d(x), np.atleast_2d(response), axes=-1)[:, :x.shape[-1]]


def add(out, s, sound):
    """Mix a sound in at s seconds."""
    i = max(int(s * SR), 0)
    out[:, i:i + sound.shape[-1]] += sound[:, :N - i]


def scene():
    """Work in the engine bay, the garage behind, and quiet outdoor air."""
    touches, touches_to_garage = knocks()
    tool = ratchet() + motor_chirp()
    laid_down, far_bird = clatter(), bird()
    room = garage(touches_to_garage + from_db(-12.0) * tool + from_db(-16.5) * laid_down + far_bird)
    work = off_centre(touches + tool + scrapes())
    return work + laid_down * from_db([[-.3], [.3]]) + room + far_bird + air_and_rumble()


def record(dry, top_hz=15300):
    """The microphone drops the deep bass and rounds the sharpest peaks; the highest treble is cut."""
    thin = filtered(dry, "high", hz=46, order=3)
    rounded = .65 * np.tanh(thin / .65)
    return signal.sosfilt(signal.ellip(10, .1, 90, top_hz, fs=SR, output="sos"), rounded)


dry = scene()
out = record(dry)
generate_wav(out)
```